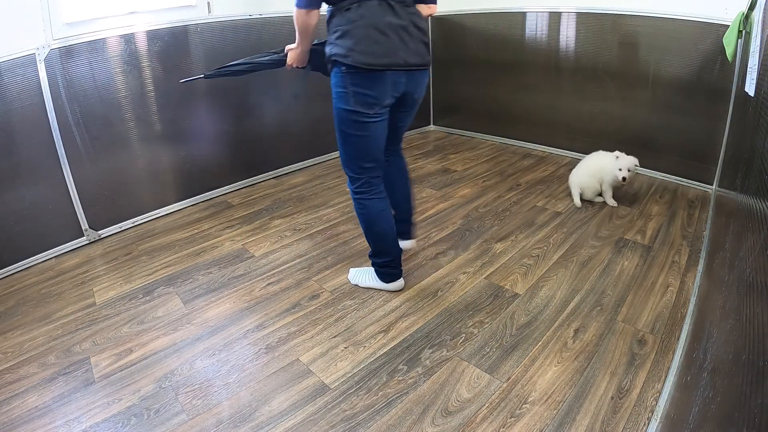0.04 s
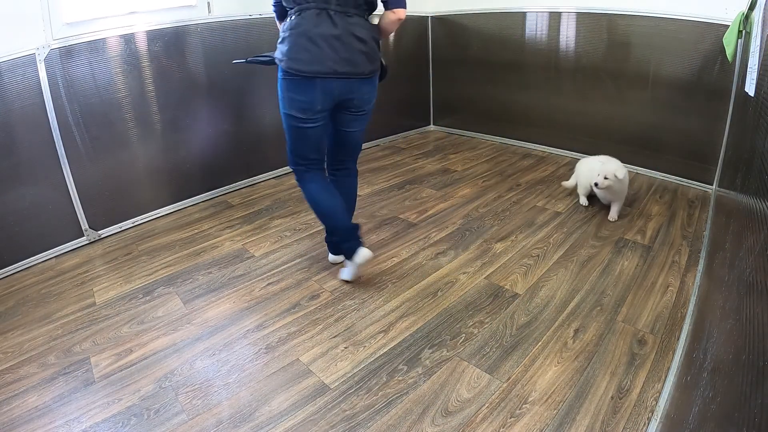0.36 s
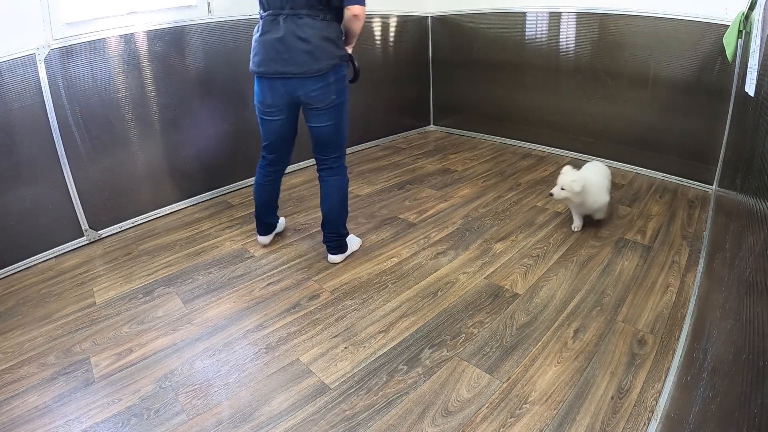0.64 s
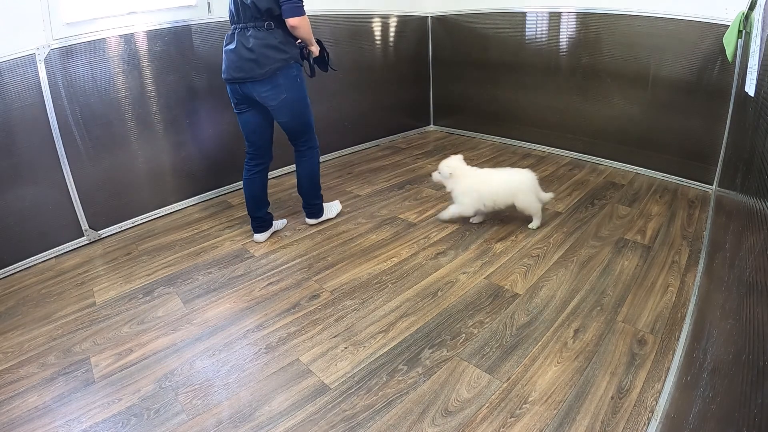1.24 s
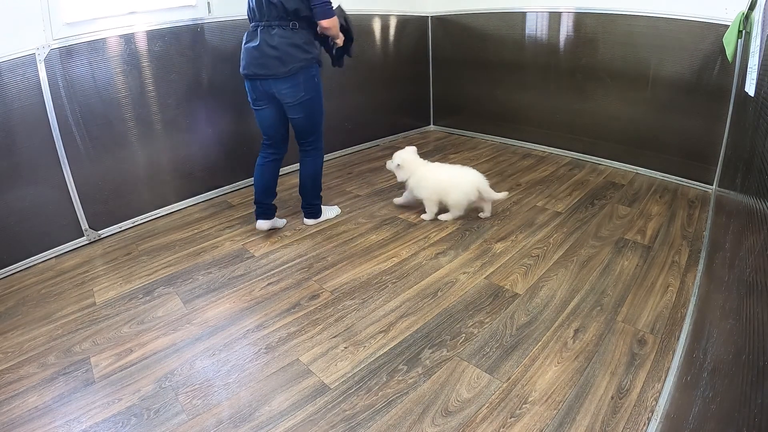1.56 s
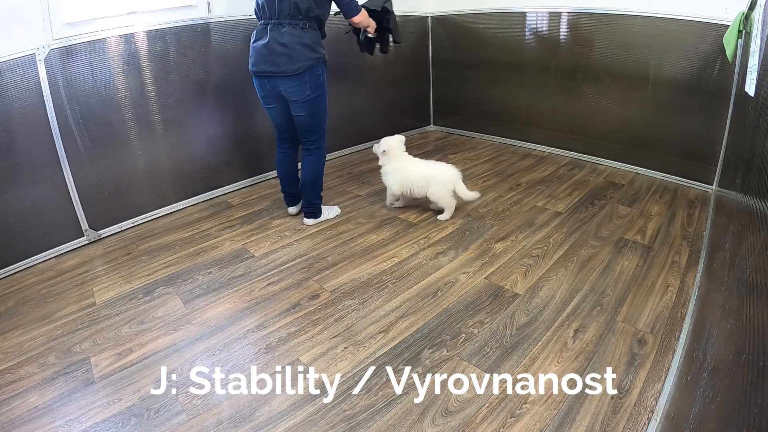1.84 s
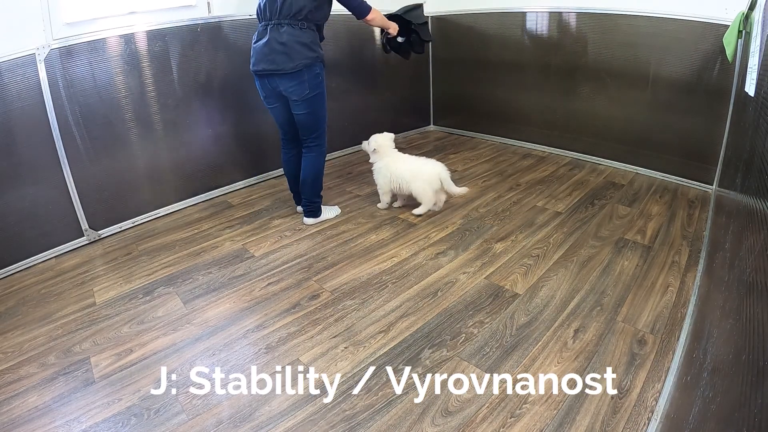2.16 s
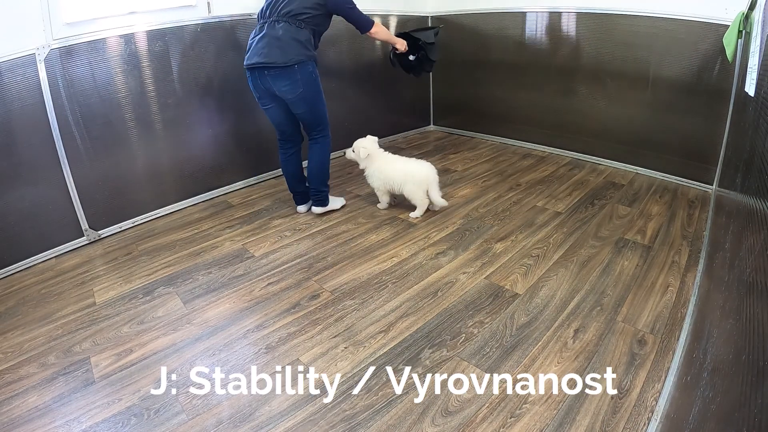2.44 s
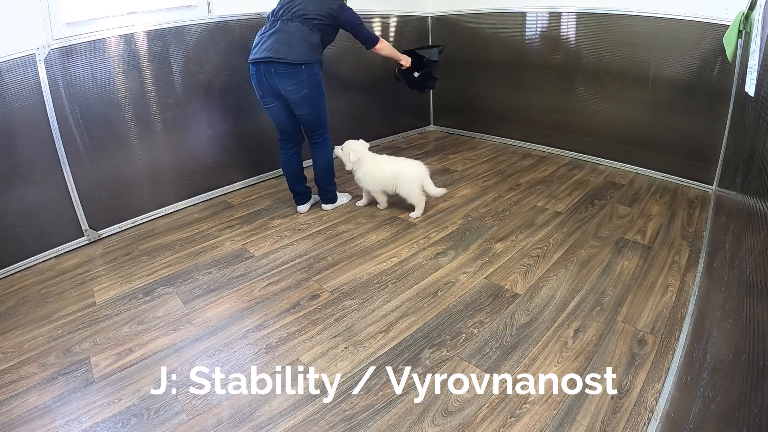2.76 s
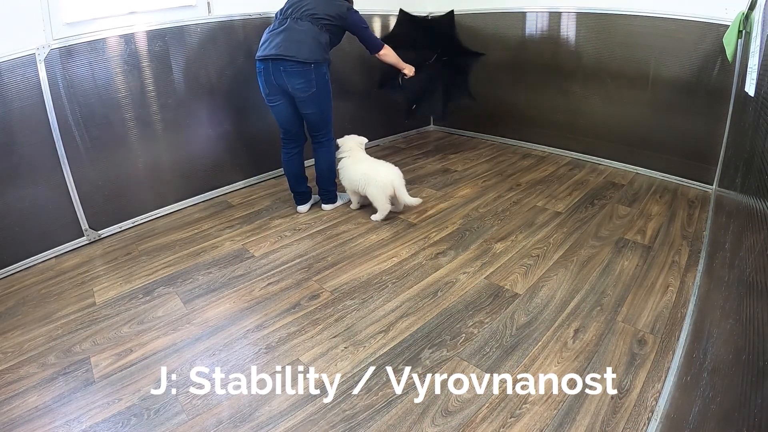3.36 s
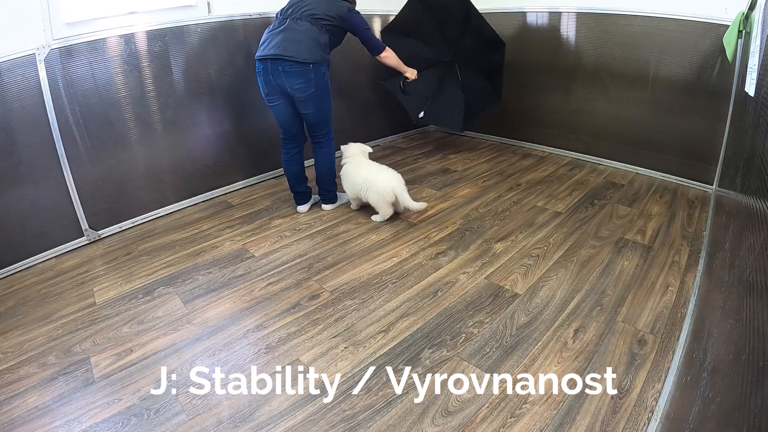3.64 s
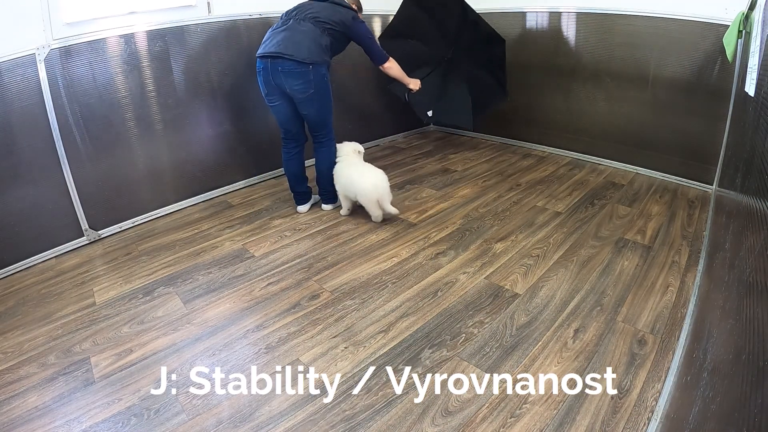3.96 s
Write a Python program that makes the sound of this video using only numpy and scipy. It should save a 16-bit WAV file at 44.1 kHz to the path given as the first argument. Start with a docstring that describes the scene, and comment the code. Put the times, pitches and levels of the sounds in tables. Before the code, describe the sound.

An umbrella is opened in a bare room with a low rumble. For the first three seconds, soft footsteps in socks thud and jeans brush. The ribs tick at about 1 second, and the folded nylon rustles around 1.5 to 2 seconds. From 3 seconds the runner scrapes upward and the folds flap out. Near 3.6 seconds the canopy snaps taut with a loud, drum-like boom that fades quickly.

```python
"""First come a low room rumble, brushing jeans and the dull thuds of socks crossing a bare, echoing room.
Nylon rustles against nylon as a folded umbrella is loosened, and its ribs tick together.
The runner (the sliding ring) scrapes up the shaft, and the folds flap out, pushing puffs of air.
Then the runner latches and the canopy snaps taut, booming like a drum."""
import sys
import numpy as np
from scipy import signal
from scipy.fft import rfft, irfft
from scipy.io import wavfile

SR = 44100
rng = np.random.default_rng(int(sys.argv[2]) if len(sys.argv) > 2 else 0)


def put_to_file(sound):
    """Save the sound as 16-bit audio at rate SR, in the file named by the first command-line argument."""
    columns = np.atleast_2d(sound).T  # one column per channel
    safe = np.clip(columns, -1, 1)
    whole_steps = np.round(safe * 32767)
    wavfile.write(sys.argv[1], SR, whole_steps.astype(np.int16))


N = 176400
T = np.arange(N) / SR
HZ = np.fft.rfftfreq(N, 1 / SR)

# tone of the building's rumble (frequency [Hz], relative level [dB])
RUMBLE_TONE = [(20, -12.5), (45, -5), (120, 1), (170, -10), (230, -7.5), (300, -17), (400, -17), (520, -25),
               (800, -28), (1300, -23.5), (2500, -34.5), (15000, -78)]
# low hums that never stop (frequency [Hz], level [dB])
HUMS = [(118.5, -55.5), (221, -59)]
# a deep hum that comes and goes (time [s], level [dB])
DRONE_LEVELS = [(0, -54.5), (.5, -44.5), (1.3, -64.5), (1.5, -50.5), (2.1, -58), (2.74, -63.5),
                (2.84, -44.5), (3.02, -39.5), (3.75, -42), (4, -54)]
# how long the echo lasts (frequency [Hz], time to fade by 60 dB [s])
ECHO_FADE = [(250, 0.74), (1000, 0.52), (5000, 0.59), (8000, 0.48), (16000, 0.4)]
# how much sound spreads to the sides (frequency [Hz], gain [dB])
STEREO_WIDTH = [(60, -25), (125, -16.5), (500, -10.5), (2000, -5), (4000, -2)]
# how much louder the left is than the right (frequency [Hz], gain [dB])
LEFT_LEAN = [(250, -0.24), (3000, 1.7), (12000, -1.6)]

# soft footfalls (time [s], level [dB])
STEPS = [(.3, -48.5), (.58, -51), (.87, -38.5), (1.4, -43), (1.751, -38.5), (1.96, -42.5), (2.37, -37.5),
         (2.8, -45.5)]
# tone of a footfall (frequency [Hz], relative level [dB])
STEP_TONE = [(25, -18), (55, -0.5), (78, 4.5), (130, -10.5), (220, -22.5), (5000, -88)]
# trouser legs and sleeves brushing (peak time [s], rise [s], fall [s], level [dB])
BRUSHES = [(.0, .05, 0.032, -52), (.25, 0.12, 0.069, -55.5), (.39, 0.083, 0.096, -53),
           (.57, 0.097, 0.084, -57), (1.18, .2, 0.059, -57), (1.52, 0.15, 0.42, -54.5),
           (2.19, 0.057, 0.054, -60.5), (2.4, 0.12, .13, -58), (2.76, 0.054, 0.046, -65)]
# tone of the clothes (frequency [Hz], relative level [dB])
BRUSH_TONE = [(200, -9), (450, -4.5), (800, -9.5), (1100, -0.5), (1600, 0.5), (2100, -2.5), (3800, -5.5),
              (7000, -14), (15000, -36)]

# nylon rubbing as the umbrella is loosened (time [s], level [dB])
LOOSEN_RUB = [(.0, -60.5), (.4, -62), (.84, -63.5), (.89, -53.5), (1.18, -62), (1.32, -62.5), (1.45, -53),
              (1.62, -49), (1.77, -46), (1.9, -55.5), (2.02, -61.5), (2.42, -67), (2.65, -66)]
# nylon rubbing as the runner is pushed up (time [s], level [dB])
PUSH_RUB = [(3.0, -67), (3.035, -52), (3.075, -48), (3.16, -44), (3.2, -46.5), (3.24, -42), (3.325, -38.5),
            (3.37, -42.5), (3.48, -47.5), (3.55, -45.5), (3.58, -71)]
# tone of the rubbing (frequency [Hz], relative level [dB])
RUB_TONE = [(250, -16.5), (800, -9.5), (1400, -3), (2400, 1), (4000, 0), (8500, -13.5), (10500, -22.5),
            (12500, -25), (14000, -49)]
# folds flapping out, then bouncing back (time [s], cloth level [dB], air level [dB])
FLAPS = [(3.232, -34.5, -46), (3.273, -41, -49), (3.305, -39, -35), (3.328, -34, -36.5),
         (3.372, -37.5, -30.5), (3.404, -38.5, -35), (3.436, -47, -32.5), (3.605, -27.5, -28.5),
         (3.648, -29.5, -19.5), (3.796, -45, -34), (3.944, -53, -34)]
# tone of a flap (frequency [Hz], relative level [dB])
FLAP_TONE = [(100, -29), (250, -1), (420, 5.5), (700, 0), (1150, -1.5), (1600, -10), (3000, -25),
             (15000, -55)]
# tone of the pushed air (frequency [Hz], relative level [dB])
AIR_TONE = [(30, -14.5), (110, 1.5), (160, -10.5), (500, -34.5), (5000, -94)]
# tone of the runner's scrape (frequency [Hz], relative level [dB])
SCRAPE_TONE = [(1500, -31), (2200, -3), (3400, -2), (6000, -15.5), (15000, -38)]
# ribs ticking together (time [s], level [dB])
RIB_TICKS = [(1.018, -34.5), (1.031, -41), (3.795, -49)]
# tone of a tick (frequency [Hz], relative level [dB])
TICK_TONE = [(500, -22), (1800, -11), (2500, 4.5), (4000, 7.5), (5000, -6), (15000, -56)]
# tone of the latch (frequency [Hz], relative level [dB])
LATCH_TONE = [(420, -34), (1400, -9.5), (2020, 5), (3200, -1), (5100, -12), (7400, -13.5), (10200, -23.5),
              (12300, -24), (15400, -40)]
# cloth panels cracking taut (time [s], level [dB], fall [s])
CRACKS = [(3.5615, -22.5, 0.006), (3.571, -18.5, 0.0045), (3.587, -27.5, 0.0081), (3.613, -34, 0.006)]
# tone of a crack (frequency [Hz], relative level [dB])
CRACK_TONE = [(60, -13), (160, 0), (290, 0), (520, 3.5), (1450, -4.5), (2500, -2), (4200, -5),
              (6500, -17.5), (10000, -28.5), (12300, -31), (14000, -50)]
# notes of the taut canopy (frequency [Hz], relative level [dB], time to fade by 60 dB [s])
CANOPY_NOTES = [(49.5, -25, 0.6), (89, -13.5, .52), (112.6, -8.5, 0.46), (151, -22.5, 0.45),
                (183, -9.5, .34), (290.7, -24.5, .52), (373, -33.5, .38), (421, -34, 0.52), (588, -28, .33),
                (600, -31, 0.44), (658, -34, .42), (790, -29, 0.39), (970, -36.5, 0.57)]


def amp(db):
    """Turns decibels into a gain to multiply by."""
    return 10 ** (np.asarray(db) / 20)


def unit(x):
    """Scales a signal to an average power of 1."""
    return x / np.sqrt(np.mean(abs(x) ** 2) + 1e-20)


def read(points, hz):
    """Reads between a table's rows on a pitch-like (logarithmic) frequency scale."""
    freqs, values = np.transpose(points)
    return np.interp(np.log(hz + 1), np.log(freqs + 1), values)


def level(points):
    """Joins (time [s], level [dB]) points into a gain over time."""
    return amp(np.interp(T, *np.transpose(points)))


def colour(x, tone):
    """Filters a sound to the given tone; white noise keeps its power."""
    log_gain = np.log(unit(amp(read(tone, HZ))))
    mirrored = np.r_[log_gain, log_gain[-2:0:-1]]
    response = np.exp(np.conj(signal.hilbert(mirrored)))  # rings after a hit, never before
    taps = irfft(response[:len(HZ)])[:4096]
    return signal.fftconvolve(x, taps)[:N]


def noise():
    """White noise: an even hiss."""
    return rng.standard_normal(N)


def burst(start, rise_s, fall_s):
    """A loudness curve that climbs in a straight line, then dies away."""
    return np.clip((T - start) / rise_s, 0, 1) * np.exp(-np.maximum(T - start - rise_s, 0) / fall_s)


def waver(rate_hz):
    """A slow random wobble in strength and phase, as complex numbers."""
    hz = np.fft.fftfreq(N, 1 / SR)
    return unit(np.fft.ifft((noise() + 1j * noise()) * np.exp(-(hz / rate_hz) ** 2)))


def rumble(db=-49):
    """The building makes a steady low noise."""
    return amp(db) * colour(noise(), RUMBLE_TONE)


def hum(waver_hz=10.1, drone_hz=49.4, octave_db=-12.5):
    """Low tones waver in the room while a deeper one swells and fades."""
    tones = sum(amp(db) * waver(waver_hz) * np.exp(2j * np.pi * hz * T) for hz, db in HUMS)
    deep = np.exp(2j * np.pi * drone_hz * T)
    swell = level(DRONE_LEVELS) * (1 + 0.26 * waver(waver_hz))
    drone = swell * (deep + amp(octave_db) * deep ** 2)
    return np.sqrt(2) * (tones + drone).real


def echo_tail(echoes_per_s=5000, gap_s=0.0015, build_s=0.0045):
    """Hard walls answer a click with a crowd of echoes; the highest pitches die first."""
    echoes = np.sign(rng.standard_normal(SR)) * (rng.random(SR) < echoes_per_s / SR)
    echoes *= np.clip((T[:SR] - gap_s) / build_s, 0, 1)
    hz, times, bands = signal.stft(echoes, SR, nperseg=256)
    fade = amp(-60 * times / read(ECHO_FADE, hz)[:, None])
    tail = signal.istft(bands * fade, SR, nperseg=256)[1]
    return tail / np.linalg.norm(tail)


def room_echo(x, count=5, cycle_hz=30):
    """The sound takes turns among several echo tails, so the echo stays smooth and does not ring."""
    offsets = np.arange(count)[:, None] / count
    shares = np.maximum(np.cos(2 * np.pi * (T * cycle_hz - offsets)), 0) ** 2
    shares /= np.linalg.norm(shares, axis=0)
    return sum(signal.fftconvolve(x * share, echo_tail())[:N] for share in shares)


def footsteps(rise_s=0.031, fall_s=0.078):
    """Feet in socks press dull thuds out of the floor."""
    thuds = sum(amp(db) * burst(start, rise_s, fall_s) for start, db in STEPS)
    return colour(noise() * thuds, STEP_TONE)


def rustle(snaps_per_s=2500, spread_db=3.5, rub_gain=0.87):
    """Rubbing cloth makes tiny snaps of uneven size over a smooth hiss."""
    snaps = (rng.random(N) < snaps_per_s / SR) * np.sign(noise())
    sizes = amp(spread_db * np.minimum(rng.exponential(1, N), 5))
    return unit(unit(snaps * sizes) + rub_gain * noise())


def clothes():
    """Each stride or reach is one swell of rubbing cloth."""
    swells = sum(amp(db) * np.exp(-((T - peak) / np.where(T < peak, rise, fall)) ** 2)
                 for peak, rise, fall, db in BRUSHES)
    return colour(rustle() * swells, BRUSH_TONE)


def nylon(rise_s=0.0033, fall_s=0.019):
    """The folds rub together, then flap out and push air."""
    rub = colour(rustle() * level(LOOSEN_RUB + PUSH_RUB), RUB_TONE)
    flaps = sum(amp(db) * burst(start, rise_s, fall_s) for start, db, _ in FLAPS)
    puffs = sum(amp(db) * burst(start, rise_s, fall_s) for start, _, db in FLAPS)
    return rub + colour(rustle() * flaps, FLAP_TONE) + colour(noise() * puffs, AIR_TONE)


def runner(db=-44.5):
    """The runner scrapes as it is shoved up the shaft."""
    shove = amp(db) * burst(start=3.045, rise_s=0.08, fall_s=0.11)
    return colour(rustle() * shove, SCRAPE_TONE)


def ticks_and_snap(rise_s=0.00066):
    """The ribs tick together, the runner latches and the panels crack taut."""
    ticks = sum(amp(db) * burst(start, rise_s, fall_s=0.0018) for start, db in RIB_TICKS)
    latch = amp(-18.5) * burst(start=3.5548, rise_s=rise_s, fall_s=0.0055)
    cracks = sum(amp(db) * burst(start, rise_s, fall) for start, db, fall in CRACKS)
    return (colour(noise() * ticks, TICK_TONE)
            + colour(noise() * latch, LATCH_TONE)
            + colour(noise() * cracks, CRACK_TONE))


def canopy_boom(start=3.56, rise_s=0.0023, gain_db=-1, flutter_hz=9.8, full_flutter_above_hz=670):
    """The stretched canopy rings like a drum; its higher notes flutter as the cloth settles."""
    age = np.maximum(T - start, 0)
    ring = 0
    for k, (hz, db, fade_s) in enumerate(CANOPY_NOTES):
        depth = min(hz / full_flutter_above_hz, 1)
        flutter = np.sqrt(1 - depth ** 2) + depth * waver(flutter_hz)
        note = (flutter * np.exp(2j * np.pi * hz * age)).imag
        direction = -(-1) ** k  # neighbouring notes start by swinging opposite ways
        ring += direction * amp(db - 60 * age / fade_s) * note
    return amp(gain_db) * (1 - np.exp(-age / rise_s)) * ring


def scene(echo_db=-0.5, left_lag_s=0.000045):
    """Mixes to stereo: direct sound near the middle, echoes wide up high and narrow down low."""
    direct = clothes() + nylon() + runner() + ticks_and_snap()
    echo_gain = amp(echo_db)
    in_room = (direct + echo_gain * room_echo(direct)) / np.hypot(1, echo_gain)
    middle = rfft(in_room + footsteps() + canopy_boom() + hum() + rumble())
    side = rfft(room_echo(direct) + footsteps() + rumble()) * amp(read(STEREO_WIDTH, HZ))
    lean = amp(read(LEFT_LEAN, HZ) / 2)  # half goes to each ear
    lag_s = left_lag_s / np.hypot(1, HZ / 2000)  # high pitches lag less
    left = irfft((middle + side) * lean * np.exp(-2j * np.pi * HZ * lag_s))
    right = irfft((middle - side) / lean)
    return np.array([left, right])


def record(dry, cutoff_hz=15600):
    """Cuts away the very highest pitches."""
    low_pass = signal.firwin(511, cutoff_hz, window=("kaiser", 9), fs=SR)
    return signal.oaconvolve(dry, low_pass[None], "same")


dry = scene()
out = record(dry)
put_to_file(out)
```